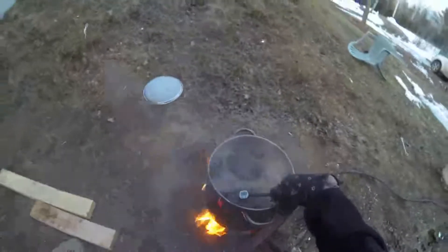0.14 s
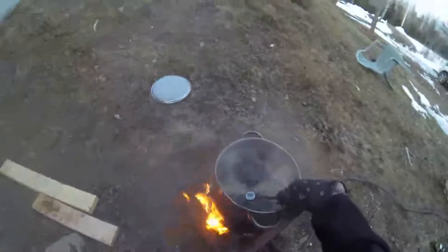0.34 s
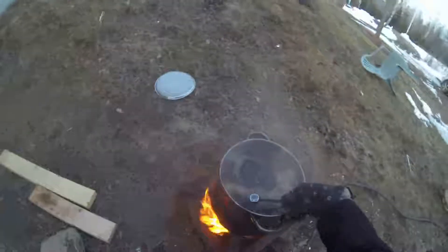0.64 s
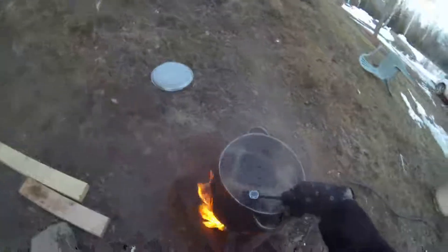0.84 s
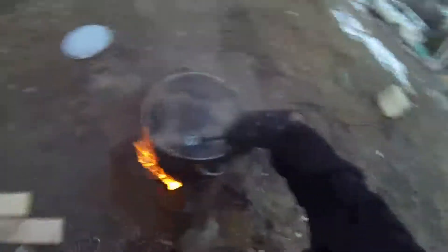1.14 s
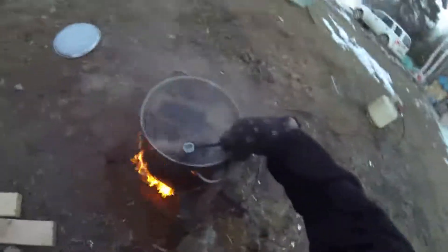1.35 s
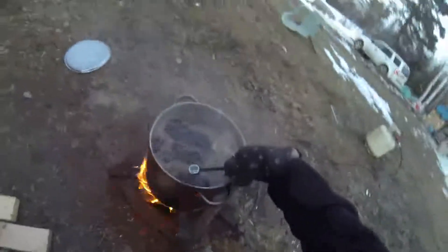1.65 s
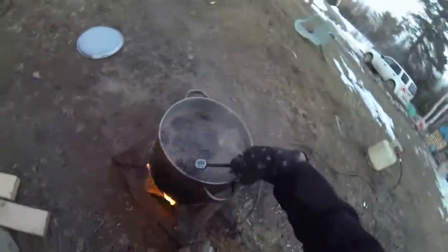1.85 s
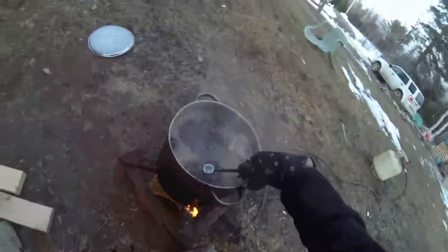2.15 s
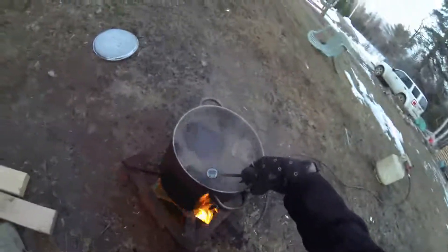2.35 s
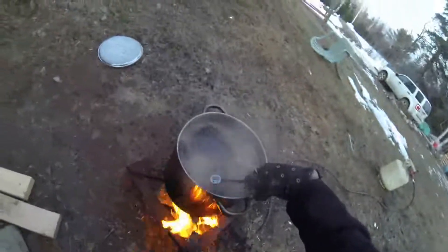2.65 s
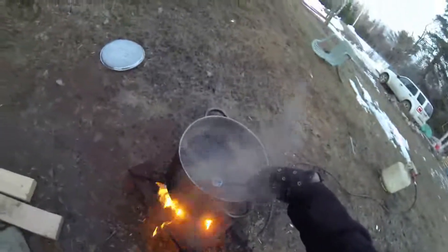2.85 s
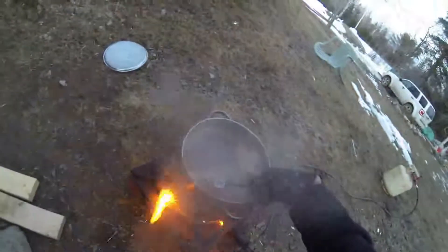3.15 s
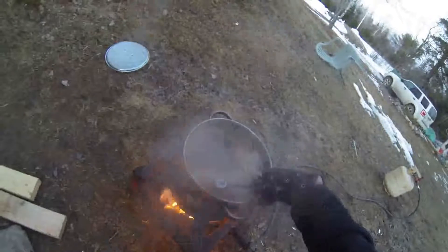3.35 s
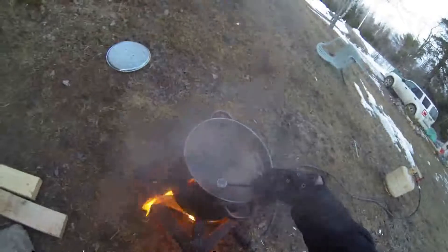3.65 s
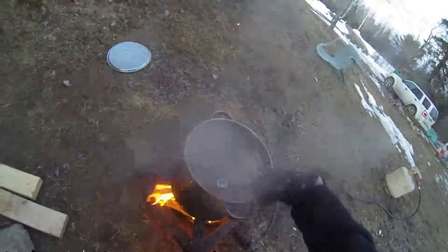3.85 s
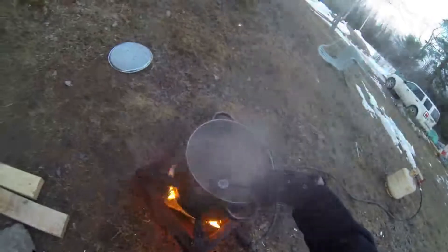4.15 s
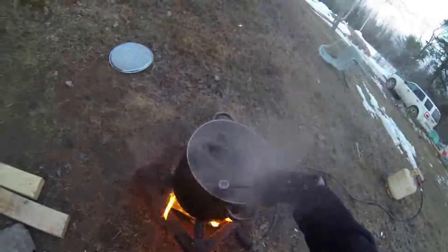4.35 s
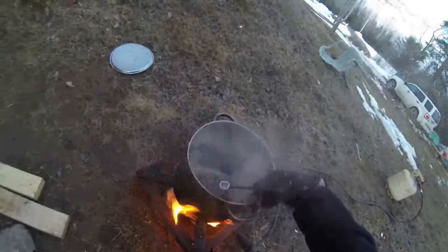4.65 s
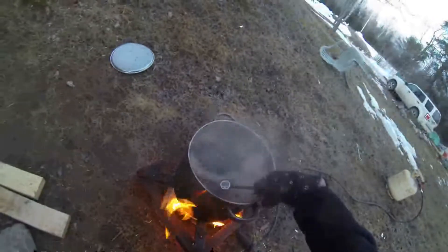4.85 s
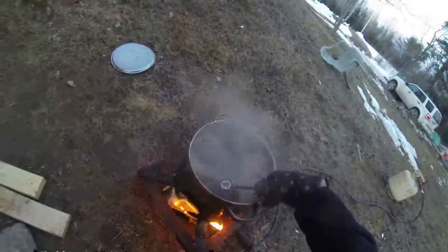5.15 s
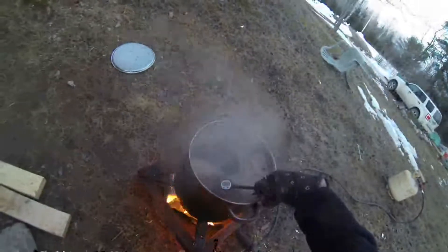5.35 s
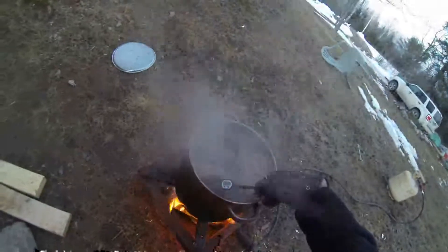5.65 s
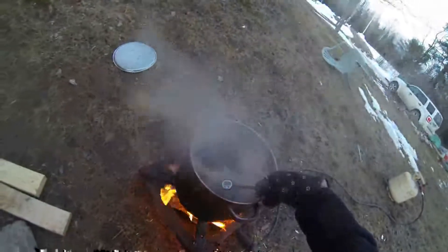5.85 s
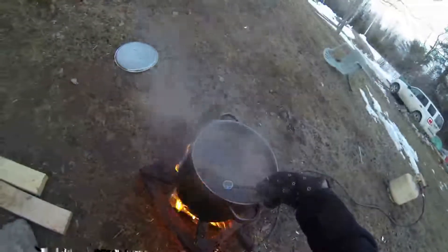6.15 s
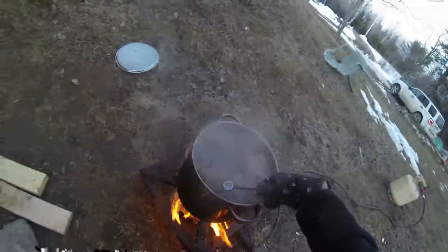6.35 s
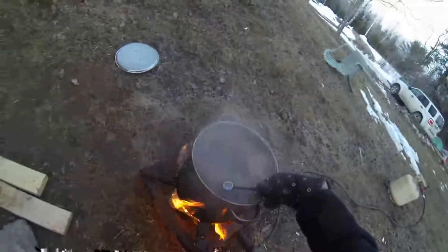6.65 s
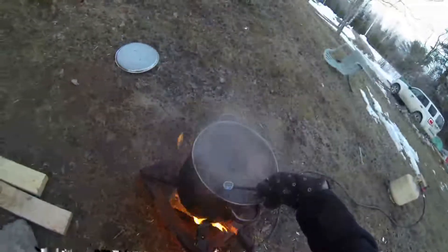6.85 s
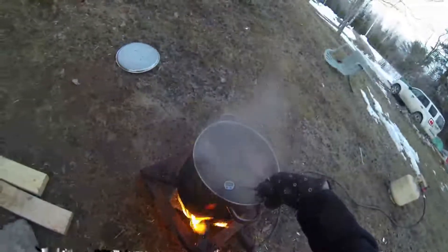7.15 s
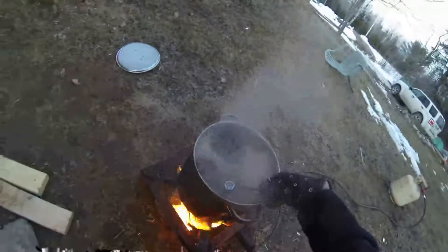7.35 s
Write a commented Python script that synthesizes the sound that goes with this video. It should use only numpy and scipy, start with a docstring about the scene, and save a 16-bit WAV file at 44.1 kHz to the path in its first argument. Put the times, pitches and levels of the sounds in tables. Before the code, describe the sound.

Thick syrup seethes in a large metal pot at arm's length, a steady frothy bubbling with random plops, wet sputters and small snaps. Underneath, a wood fire hisses softly with thin steam jets and rare ember ticks. Low wind gusts buffet the microphone between about 1.7 and 3.4 seconds, strongest near 2.6, then ease to a breeze with small puffs. Open air, dry, no echo.

```python
"""A big pot of syrup boils hard over a wood fire outdoors, an arm's length from the microphone.
Seething foam is bursts of tiny ticks in the pot's resonances; bubbles and plops are short damped tones.
Pockets of steam sputter up with a snap, a thud and spray; films crack and spit droplets.
Underneath, the fire is a dense hiss of ticks with steam jets, ember ticks and a low drone.
Wind is low turbulence driven by a breeze and gusts, with damped low slaps on the microphone."""
import sys
import numpy as np
from scipy import signal
from scipy.fft import rfft, irfft, next_fast_len
from scipy.io import wavfile
from scipy.ndimage import uniform_filter1d

SR = 44100
rng = np.random.default_rng(int(sys.argv[2]) if len(sys.argv) > 2 else 0)


def waveform_to_disk(signal):
    """Save audio, clipped to [-1, 1], as 16-bit WAV at the path in sys.argv[1]."""
    frames = np.transpose(np.atleast_2d(signal))
    scaled = np.clip(frames, -1, 1) * 32767
    samples = np.round(scaled).astype(np.int16)
    wavfile.write(sys.argv[1], SR, samples)


N = 330309
TIME = np.arange(N) / SR
GRID = np.fft.rfftfreq(8192, 1 / SR)  # filter design frequencies, Hz

# Strength of the boil. Each row: time in seconds, bubbling in dB, sizzle in dB, both before each layer's trim.
BOIL = [(0, -56.5, -62), (.6, -58.5, -62.5), (1.35, -55.5, -60.5), (2.1, -55.5, -62), (2.55, -59, -62.5),
        (3.1, -56.5, -64.5), (3.65, -55.5, -62.5), (3.9, -59.5, -64.5), (4.8, -57.5, -64.5),
        (5.35, -59, -67), (7.1, -59, -65), (7.49, -56, -60)]


def seethe(churn_db=-3.0, films_db=-2.04, sizzle_db=-0.7, fizz_db=-6, surge_db=1.94, flutter_db=1.63):
    """Foam: deep churn and bursting films surge together; sizzle and finer fizz flutter separately."""
    bubbling_db = curve(BOIL) + surge_db * drift(18)
    sizzling_db = curve(BOIL, axis=2)
    churn = pot(ticks(1500, 2.6), 137, 615)
    films = pot(ticks(1500, 1.86) * clumps(3.3, 110), 499, 2080)
    sizzle = pot(ticks(2600, 1.6) * clumps(0.65, 90), 2080, 3520)
    fizz = pot(ticks(4000, 0.89), 3450, 6300)
    out = churn * from_db(bubbling_db + churn_db)
    out += films * from_db(bubbling_db + films_db)
    out += sizzle * from_db(sizzling_db + flutter_db * drift(25) + sizzle_db)
    out += fizz * from_db(sizzling_db + flutter_db * drift(25) + fizz_db)
    return out


def fine_bubbles(trim_db=-10.0):
    """Pinhead bubbles pop as short damped tones of scattered pitch."""
    popping = bubbles(per_s=260, pitch_hz=1700, octaves=0.39, damping_s=0.00131, spread_db=1.5)
    return popping * from_db(curve(BOIL) + trim_db)


def small_plops(trim_db=-6, ring_db=-9):
    """A patter of lesser bubbles, damped tones with the pot ringing after them."""
    patter = bubbles(per_s=300, pitch_hz=950, octaves=0.59, damping_s=0.001573, spread_db=2.0)
    ringing = patter + from_db(ring_db) * ring_on(patter)
    return unit(ringing) * from_db(curve(BOIL) + trim_db)


def plops(trim_db=1.5, glide=0.002, ring_db=-15):
    """Fat surface bubbles, their pitch lifting slightly as the cavity shrinks; the pot rings after them."""
    # Each row: start in seconds, level in dB before the trim, pitch in Hz,
    # swings per damping time (under 1 a click, near 2 a plop).
    plop_rows = [(.1025, -48, 800, 1.14), (.1949, -34.5, 820, 0.96), (.256, -45, 1000, 2.2),
                 (0.4137, -44, 885, 2), (0.46, -39.5, 1200, 0.66), (0.665, -47, 480, 0.75),
                 (.9475, -47, 850, 1.5), (.972, -47, 1500, 1.3), (.979, -53, 800, 1.4),
                 (1.021, -38, 1690, 1.66), (1.1452, -33, 1200, 0.63), (1.375, -43.5, 950, 1.95),
                 (1.489, -49, 1400, 1.5), (1.571, -56, 377, 1.3), (1.801, -44, 298, 1.05),
                 (1.8082, -42, 990, 1.5), (1.8515, -46, 910, 1.54), (1.922, -49, 330, 1),
                 (1.9567, -41.5, 890, 1.67), (2.036, -40.5, 696, 1.04), (2.048, -51, 333, 1.2),
                 (2.11, -43, 1450, 1.6), (2.197, -33.5, 590, 1.13), (2.2201, -24, 1010, 1.48),
                 (2.2207, -35, 1650, 2.03), (2.2692, -42.5, 1560, 2.4), (2.27, -44, 850, 1.1),
                 (2.284, -39.5, 480, 0.95), (2.353, -45.5, 310, 1.2), (2.3853, -40, 885, 1.6),
                 (2.6235, -44, 950, 1.4), (2.7247, -41, 1540, 1.4), (2.733, -43.5, 330, 1.37),
                 (2.808, -40, 930, 1.24), (2.853, -41, 840, 0.58), (3.0595, -42.5, 930, 1.4),
                 (3.1213, -39, 617, 1.3), (3.32, -41.5, 327, 0.83), (3.5018, -40.5, 1200, 0.57),
                 (3.529, -43, 620, 0.79), (3.5475, -39.5, 1060, 1), (3.654, -46, 1900, 1.9),
                 (3.69, -48, 720, 1.2), (3.702, -51, 520, 0.77), (3.7105, -37, 900, 1.77),
                 (3.823, -45, 720, 1.2), (3.843, -49, 700, 0.89), (3.865, -42.5, 1090, 1.65),
                 (3.8925, -41, 970, 2.2), (4.059, -42.5, 1420, 2.5), (4.063, -44, 790, 1.7),
                 (4.096, -45, 290, 0.68), (4.167, -44, 1480, 2.3), (4.183, -44, 610, 1.24),
                 (4.249, -44.5, 540, 1.1), (4.4136, -41.5, 335, 1.14), (4.441, -53, 344, 1.5),
                 (4.646, -42, 470, 0.88), (4.8345, -40, 890, 1.65), (4.856, -51, 370, 1.2),
                 (5.078, -41.5, 392, 2), (5.1021, -45, 865, 0.95), (5.28, -40.5, 220, 1.02),
                 (5.283, -41.5, 970, 1.8), (5.324, -50, 298, 0.91), (5.4264, -40, 933, 3.3),
                 (5.5657, -44, 900, 1.4), (5.739, -42, 303, 0.76), (5.9081, -40.5, 870, 0.86),
                 (6.164, -34.5, 1210, 0.32), (6.1956, -36, 955, 0.61), (6.368, -33.5, 270, 0.76),
                 (6.371, -40, 790, 1.03), (6.396, -45, 380, 0.59), (6.409, -41, 270, 1.1),
                 (6.543, -45, 940, 2.6), (6.872, -44.5, 418, 1.16), (6.9399, -36, 516, 0.74),
                 (6.956, -46, 330, 1), (7.038, -46.5, 300, 1.05), (7.187, -39.5, 485, 1),
                 (7.359, -39.5, 690, 1.1), (7.4098, -36, 350, 0.61), (7.4115, -44, 950, 1.03),
                 (7.429, -55, 400, 1.16), (7.442, -40, 292, 0.95)]
    out = np.zeros(N)
    for s, db, hz, swings in plop_rows:
        add(out, s, from_db(db + trim_db) * blip(hz, swings / hz, glide))
    return out + from_db(ring_db) * ring_on(out)


def pips(glide=0.0026):
    """Films sing for an instant as they shrink: tiny high damped tones of slightly rising pitch."""
    # Each row: start in seconds, level in dB, pitch in Hz, damping time in seconds.
    pip_rows = [(.245, -52, 2670, .002), (1.563, -53, 2880, .003), (2.185, -52, 2950, .002),
                (2.269, -52, 3200, .0012), (3.829, -54, 3000, .002), (4.19, -47.5, 2970, .0035),
                (4.835, -55, 3020, .004), (6.5, -63, 2900, .002), (7.411, -46.5, 3030, .004)]
    out = np.zeros(N)
    for s, db, hz, damping_s in pip_rows:
        add(out, s, from_db(db) * blip(hz, damping_s, glide))
    return out


def sputters(rise_s=0.0019, fade=1.38, tail=0.068, tail_s=0.026, blips_db=-5):
    """Steam pockets rupture with a snap, thud in the pot and tear the foam into blips and droplets."""
    # Each row: start in seconds, length in seconds, thud, splutter and spray levels in dB before
    # the mix gains below, suddenness 0-1.
    sputter_rows = [(0.833, 0.011, -76, -62, -59.5, 0.5), (1.057, 0.017, -50.5, -51.5, -59, 0.34),
                    (1.204, 0.015, -50, -45, -59, 0), (1.255, 0.021, -49.5, -49.5, -59.5, 0.57),
                    (1.405, 0.037, -49.5, -56, -67, 0.2), (1.552, 0.03, -51, -52, -70, 0),
                    (1.833, 0.055, -52, -52, -64.5, 0.13), (2.423, 0.027, -49.5, -62, -67, 0.94),
                    (2.451, 0.021, -51, -52.5, -62, 0.4), (2.502, 0.018, -55, -50.5, -62.5, 1),
                    (2.54, 0.014, -65, -50.5, -59, 0), (2.802, 0.049, -65, -57, -64, 0.1),
                    (2.916, 0.032, -49, -55, -58, 0.14), (4.055, 0.02, -55, -51, -66, 0.36),
                    (4.164, 0.012, -53, -49.5, -61.5, 0.7), (4.188, 0.019, -72, -60, -60.5, 0.15),
                    (4.277, 0.014, -51, -51, -61, 0.4), (4.315, 0.013, -48.5, -52, -62.5, 0.2),
                    (4.363, 0.016, -49, -72, -66, 0.8), (4.393, 0.05, -54.5, -66, -78, 0.6),
                    (4.52, 0.028, -74, -52.5, -62, 0.05), (4.644, 0.027, -49.5, -56.5, -64, 0.2),
                    (4.67, 0.041, -60, -59, -65, 0.1), (4.831, 0.017, -53, -51, -61, 0.7),
                    (4.856, 0.036, -51, -81, -76, 0.1), (5.076, 0.033, -50.5, -51.5, -64, 0.73),
                    (5.279, 0.017, -52.5, -55, -64.5, 0.87), (6.37, 0.0083, -43, -46.5, -57, 0.53),
                    (6.391, 0.051, -49.5, -59, -65, 0.4), (6.484, 0.033, -46.5, -54, -58, 0.07),
                    (6.538, 0.014, -50.5, -48, -67, 0.5), (6.741, 0.023, -52.5, -51, -70, 0.3),
                    (6.824, 0.015, -56, -58, -61, 0.6), (6.95, 0.0096, -57, -56, -63, 0.6),
                    (7.014, 0.015, -49, -57, -56.5, 0.37), (7.158, 0.043, -52, -58, -63, 0.23),
                    (7.295, 0.01, -50, -51.5, -60, 0.76), (7.354, 0.0087, -54, -54, -59, 1),
                    (7.412, 0.011, -43.5, -47.5, -60.5, 1), (7.426, 0.027, -45.5, -69, -75, 0.55)]
    t = np.arange(SR // 4) / SR
    shower, rupture = np.zeros((2, 3, N))
    for s, length_s, *levels_db, sudden in sputter_rows:
        body = np.exp(-(t / (fade * length_s)) ** 2) + tail * np.exp(-t / tail_s)
        shape = (1 - np.exp(-t / rise_s)) * body
        shape /= np.sqrt(np.mean(shape[t < length_s] ** 2))
        snap = np.clip(sudden, 0, 1) * np.sqrt(length_s * SR)  # energy freed in one instant
        for k, db in enumerate(levels_db):
            add(shower[k], s, from_db(db) * shape)
            add(rupture[k], s, from_db(db) * np.array([snap]))
    thud = 0.65 * shower[0] * ticks(4000, 0.87) + rupture[0]
    splutter = 0.74 * shower[1] * ticks(900, 1.0) * clumps(2.5, 230)
    splutter += ring_on(rupture[1], t60=0.034, delay_s=0)
    spray = 1.16 * shower[2] * ticks(2500, 1.0) * clumps(4.1, 200)
    spray += 1.86 * ring_on(rupture[2], t60=0.12, delay_s=0)
    blips = shower[1] * bubbles(per_s=900, pitch_hz=1076, octaves=0.65, damping_s=0.00146, spread_db=1.0)
    out = from_db(blips_db) * blips
    return out + pot(thud, 140, 537) + pot(splutter, 590, 1920) + pot(spray, 2020, 7000)


def snaps(ring_db=-6):
    """Larger films tear: impulses through two registers of the pot, with a brief ring."""
    # Each row: time in seconds, crack impulse in dB, tick impulse in dB, both before filtering.
    snap_rows = [(0.335, -36, -48), (0.404, -38, -31), (.489, -29, -46), (0.672, -33, -33),
                 (.783, -29, -47), (1.288, -30, -40), (1.586, -31, -42), (1.829, -29, -33),
                 (2.055, -26, -42), (2.084, -27, -44), (2.221, -34, -43), (2.456, -43, -39),
                 (2.511, -33, -34), (2.737, -24, -44), (2.749, -32, -42), (2.785, -40, -31.5),
                 (2.843, -32, -42), (2.871, -28, -41), (3.148, -33, -45), (3.334, -42, -38),
                 (3.479, -30, -45), (3.527, -33, -37), (3.711, -30, -44), (3.802, -31, -42),
                 (3.812, -40, -33), (4.06, -31, -45), (4.078, -41, -44), (4.166, -32, -42),
                 (4.368, -47, -42), (4.525, -29, -41), (4.634, -40, -34), (4.681, -28.5, -45),
                 (4.736, -34, -42), (4.772, -30, -44), (5.14, -35, -46), (5.598, -30, -41),
                 (5.74, -33, -40), (5.803, -31, -50), (6.132, -31, -48), (6.204, -27, -47),
                 (6.371, -30, -49), (6.402, -32, -40), (6.421, -28, -37), (6.436, -28, -40),
                 (6.459, -40, -39), (6.497, -27, -49), (6.502, -31, -36), (6.755, -32, -43),
                 (7.024, -30, -31), (7.17, -35, -34)]
    crack, tick = np.zeros((2, N))
    for s, crack_db, tick_db in snap_rows:
        add(crack, s, from_db([crack_db]))
        add(tick, s, from_db([tick_db]))
    out = pot(crack, 880, 1850) + pot(tick, 2220, 5300)
    return out + from_db(ring_db) * ring_on(out, t60=0.027)


def spits(level_db=-70, per_s=90, spread_db=-0.5, ring_s=0.028):
    """Single films snap and fling a droplet: random tiny bright ticks."""
    ringing = ring_on(ticks(per_s, spread_db), t60=ring_s, delay_s=0)
    return unit(pot(ringing, 970, 8300)) * from_db(level_db)


def fire(trim_db=1.0, waver_db=1.0):
    """Damp wood hisses and crackles as dense ticks; steam jets are resonant noise that swells and fades."""
    # Each row: time in seconds, hiss level in dB before the trim.
    hiss_rows = [(0, -73), (2.1, -73), (2.6, -73.5), (4.0, -74.5), (4.9, -73.5), (5.7, -74.5),
                 (7.49, -73.5)]
    # Thin jets of steam from the damp logs. Each row: middle in seconds, length in seconds (between 1/e points),
    # pitch in Hz, half-width in Hz (at -6 dB), level in dB.
    jet_rows = [(1.14, 0.43, 8600, 700, -79), (1.5, 0.72, 8800, 497, -84), (1.85, .2, 4900, 450, -71),
                (2.42, 0.29, 4940, 450, -72), (3.53, .16, 13100, 600, -78), (4.952, 0.41, 5060, 450, -73),
                (7.376, 0.21, 8650, 400, -78)]
    hiss = pot(ticks(9000, 3.4), 6380, 17000)
    out = hiss * from_db(curve(hiss_rows) + trim_db + waver_db * drift(8.6))
    for s, length_s, hz, half_width_hz, db in jet_rows:
        swell = np.exp(-(2 * (TIME - s) / length_s) ** 2)
        out += from_db(db) * swell * resonant_noise(hz, half_width_hz)
    return out


def resonant_noise(hz, half_width_hz):
    """Turbulence sounding one resonance."""
    return colour(rng.standard_normal(N), -20 * np.log10(1 + ((GRID - hz) / half_width_hz) ** 2))


def embers(low_hz=5500, high_hz=11000, ring_s=.006):
    """Wood fibres split: single impulses with a very short high ring."""
    # Each row: time in seconds, impulse in dB before filtering.
    ember_rows = [(2.957, -49), (4.367, -40), (5.765, -50), (7.2875, -39)]
    out = np.zeros(N)
    for s, db in ember_rows:
        add(out, s, from_db([db]))
    return pot(ring_on(out, t60=ring_s, delay_s=0), low_hz, high_hz)


def drone(level_db=-62, pitch_hz=90, waver_hz=2.5, swing_db=1.5):
    """A low drone under the fire: one sine of wavering pitch and level."""
    turns = np.cumsum(pitch_hz + waver_hz * drift(6)) / SR
    return from_db(level_db + swing_db * drift(5.1)) * unit(np.sin(2 * np.pi * turns))


def wind(lull_trim_db=-1, strong_db=-40):
    """Eddies press on the microphone, crossfading to a deeper spectrum in strong gusts; slaps are damped tones."""
    # Wind noise in a lull and in a gust. Each row: frequency in Hz, relative level in dB per Hz.
    lull_spectrum = [(8, -26), (20, 6.5), (32, -4.5), (50, -8.5), (70, -10.5), (120, -16.5), (200, -27.5),
                     (400, -53.5), (1200, -68.5)]
    gust_spectrum = [(8, -10.5), (20, 7), (34, 11.5), (52, -6), (80, -8.5), (125, -21.5), (200, -35.5),
                     (400, -41.5), (1200, -95)]
    # Sudden slaps. Each row: start in seconds, level in dB, pitch in Hz, damping time in seconds.
    slap_rows = [(1.755, -25.5, 109, 0.0039), (2.294, -44, 100, 0.0092), (2.597, -37, 109, 0.0045),
                 (2.618, -32, 105, 0.0041), (2.635, -31.5, 98, 0.004), (2.657, -32, 132, 0.0047),
                 (2.768, -30, 117, 0.0078), (2.79, -35, 124, .006), (3.31, -40.5, 115, 0.01),
                 (5.76, -39, 110, 0.0057)]
    level_db = wind_level()
    strong = .5 + .5 * np.tanh((level_db - strong_db) / 6)  # share of gust noise in the power
    out = np.sqrt(1 - strong) * eddies(lull_spectrum, 0.3) * from_db(level_db + lull_trim_db)
    out += np.sqrt(strong) * eddies(gust_spectrum, 0.66) * from_db(level_db)
    for s, db, hz, damping_s in slap_rows:
        add(out, s, from_db(db) * blip(hz, damping_s))
    return out


def wind_level(swing_db=4, swings_per_s=5.7, rise=0.96, fall=1):
    """A wavering breeze plus gusts that swell slightly faster than they ebb, in dB."""
    # Light air between gusts. Each row: time in seconds, level in dB before the swing.
    breeze_rows = [(0, -51), (.8, -51.5), (1.3, -47), (3.5, -47.5), (4.3, -48.5), (4.6, -53.5),
                   (5.2, -50.5), (5.5, -52.5), (6.1, -49.5), (6.6, -48.5), (7.49, -52)]
    # Each row: peak time in seconds, length in seconds (about -12 dB on either side), peak in dB.
    gust_rows = [(0.173, .12, -47), (1.3, 1, -58), (1.7, 0.033, -33.5), (1.797, 0.034, -27.5),
                 (1.973, 0.053, -38), (2.256, 0.031, -37), (2.377, 0.058, -42), (2.475, 0.06, -42),
                 (2.635, 0.056, -21.5), (2.775, 0.032, -23.5), (2.848, 0.034, -28.5), (2.944, 0.057, -30.5),
                 (3.077, 0.039, -26), (3.16, 0.055, -28.5), (3.247, 0.026, -34), (3.321, 0.078, -33.5),
                 (3.884, 0.022, -40), (4.223, 0.037, -39), (4.276, 0.017, -39), (5.818, 0.11, -36),
                 (6.306, 0.033, -35.5), (6.605, .03, -43.5), (6.697, 0.03, -44), (7.337, 0.053, -37)]
    power = from_db(curve(breeze_rows) + swing_db * drift(swings_per_s)) ** 2
    for s, length_s, db in gust_rows:
        width_s = length_s * np.where(TIME < s, rise, fall)
        power += from_db(db) ** 2 / (1 + ((TIME - s) / width_s) ** 2) ** 4
    return 10 * np.log10(power)


def eddies(spectrum, evenness):
    """Low turbulence, its own lumps partly evened so that the gusts lead; rms 1."""
    x = unit(colour(rng.standard_normal(N), slope(spectrum)))
    power = uniform_filter1d(uniform_filter1d(x ** 2, size=1800), size=1800)
    return unit(x / (abs(power) + 1e-6) ** (evenness / 2))


def bubbles(per_s, pitch_hz, octaves, damping_s, spread_db, count=32):
    """A stream of blips in many pitches and dampings, rms 1."""
    out = np.zeros(N)
    sizes = np.linspace(-1.8, 1.8, count)
    for size, stickiness in zip(sizes, rng.standard_normal(count)):
        bubble = blip(pitch_hz * 2 ** (octaves * size), damping_s * from_db(2 * stickiness))
        stream = signal.oaconvolve(ticks(per_s / count, spread_db), bubble)[:N]
        out += stream * np.exp(-size ** 2 / 4)  # middling sizes lead
    return unit(out)


def blip(hz, damping_s, glide=0, tail_end=9.1):
    """A few swings that swell fast and then fade exponentially, cut off only in the faint tail."""
    u = np.arange(0, 12, 1 / (SR * damping_s))  # time in damping times
    turns = hz * damping_s * (u - 1) * (1 + glide * u)
    swell = (1 - np.exp(-(u / .6) ** 3)) * np.exp(1 - u)
    return swell * np.exp(-(u / tail_end) ** 4) * np.cos(2 * np.pi * turns)


def ticks(per_s, spread_db):
    """Sparse random impulses of either sign, sizes spread exponentially in dB, rms 1."""
    size = from_db(spread_db * np.minimum(rng.exponential(1, N), 4))
    return unit(size * rng.choice([-1, 1], N) * (rng.random(N) < per_s / SR))


def clumps(depth_db, per_s):
    """A quickly fluttering gain that gathers bursts into clumps, rms 1."""
    return unit(from_db(depth_db * np.tanh(drift(per_s))))


def drift(per_s):
    """Slow random wander of rms 1, rolling off above the given rate."""
    size = next_fast_len(N)
    hz = np.fft.rfftfreq(size, 1 / SR)
    spectrum = rfft(rng.standard_normal(N), size) / (1 + (hz / per_s) ** 2)
    return unit(irfft(spectrum)[:N])


def pot(x, low_hz, high_hz):
    """Filters one register through the overall colour and resonances."""
    # Overall colour of the pot. Each row: frequency in Hz, relative level in dB per Hz.
    pot_slope = [(60, -1), (200, 8.5), (420, 1.5), (720, -5.5), (1300, -14.5), (2400, -13.5), (3550, -19),
                 (4600, -21), (5900, -29), (7500, -32.5), (9600, -37.5), (11700, -40), (15000, -41)]
    # Resonances of the pot and the recorder's housing. Each row: frequency in Hz,
    # width in Hz (at half the lift), lift in dB.
    pot_peaks = [(235, 13, 2), (304.4, 62, 4), (622, 44, 4), (926, 400, 8.5), (922, 25, 3.5),
                 (992, 77, 2.5), (1602, 256, 9.5), (1765, 75, 1.5), (1904, 230, 10), (2208, 50, 6),
                 (2500, 87, 3), (2900, 230, 4.5), (3165, 500, 4.5), (3910, 160, 3), (4875, 170, 6),
                 (5255, 380, 6.5), (8480, 910, 7), (10530, 860, 3.5), (13000, 1300, 6)]
    lift = sum(db * 2 ** -((2 * (GRID - hz) / width_hz) ** 2) for hz, width_hz, db in pot_peaks)
    skirts = -10 * np.log10((1 + (low_hz / (GRID + 1)) ** 8) * (1 + (GRID / high_hz) ** 8))
    return colour(x, slope(pot_slope) + lift + skirts)


def ring_on(x, t60=0.09, delay_s=0.0014):
    """Sound bouncing between the walls of the pot: convolution with decaying noise of unit energy."""
    t = np.arange(SR // 8) / SR
    bounces = rng.standard_normal(len(t)) * from_db(-60 * t / t60) * (t > delay_s)
    return signal.oaconvolve(x, bounces / np.linalg.norm(bounces))[:N]


def colour(x, db):
    """Causal minimum-phase filter of unit energy with the shape of a dB spectrum."""
    cepstrum = irfft(np.log(from_db(np.maximum(db - db.max(), -100))))
    half = len(cepstrum) // 2
    cepstrum[1:half] *= 2  # fold to minimum phase
    cepstrum[half + 1:] = 0
    ring = irfft(np.exp(rfft(cepstrum)))[:half]
    return signal.oaconvolve(x, ring / np.linalg.norm(ring))[:N]


def slope(points):
    """A short spectrum in dB, joined on a log-frequency axis."""
    hz, db = np.transpose(points)
    return np.interp(np.log(GRID + 1), np.log(hz), db)


def curve(rows, axis=1):
    """One column of a table of times, at every sample."""
    rows = np.asarray(rows)
    return np.interp(TIME, rows[:, 0], rows[:, axis])


def add(mix, s, sound):
    """Mixes a sound in at time s."""
    part = mix[max(round(s * SR), 0):][:len(sound)]
    part += sound[:len(part)]


def unit(x):
    """Scales to rms 1."""
    return x / np.sqrt(np.mean(x ** 2) + 1e-20)


def from_db(db):
    """Decibels to gain."""
    return 10 ** (np.asarray(db) / 20)


def scene():
    """Pot, fire and wind in the open air, with no walls to echo."""
    syrup = seethe() + fine_bubbles() + small_plops() + plops() + pips() + sputters() + snaps() + spits()
    return (syrup + fire() + embers() + drone() + wind())[None]


def record(dry):
    """The recorder's band limit: a linear-phase low-pass at 15.2 kHz."""
    taps = signal.firwin(511, 15200, window=("kaiser", 9), fs=SR)
    return signal.oaconvolve(dry, taps[None], "same")


dry = scene()
out = record(dry)
waveform_to_disk(out)
```